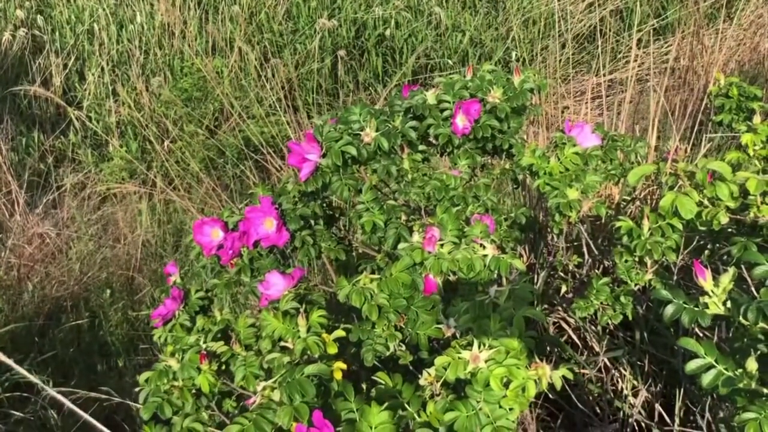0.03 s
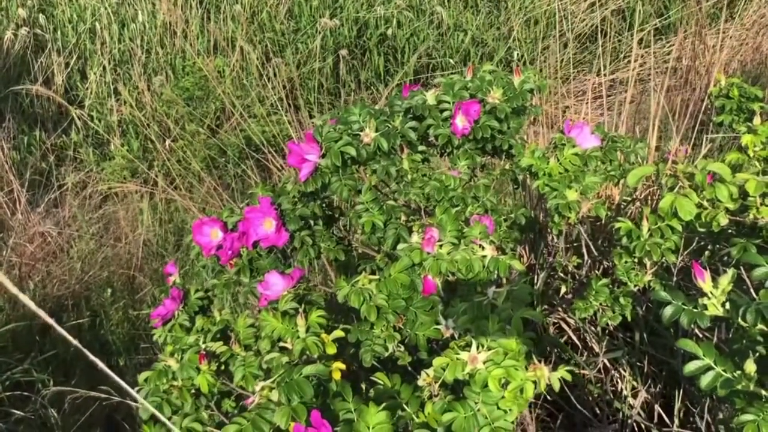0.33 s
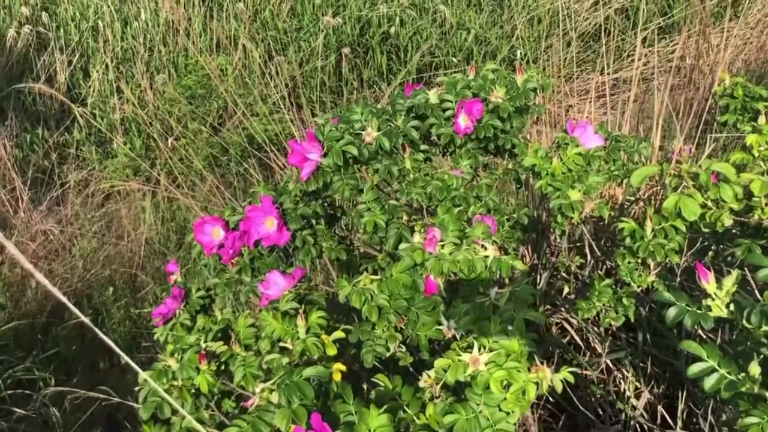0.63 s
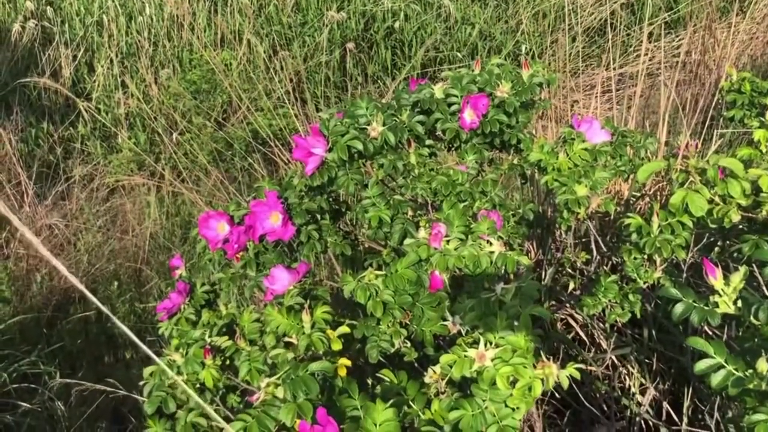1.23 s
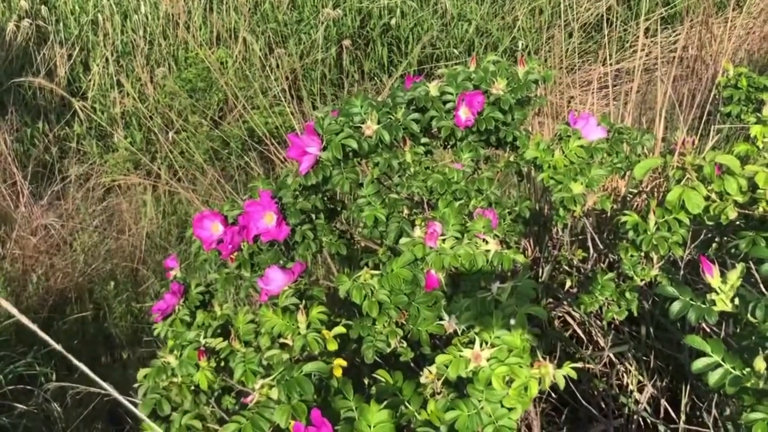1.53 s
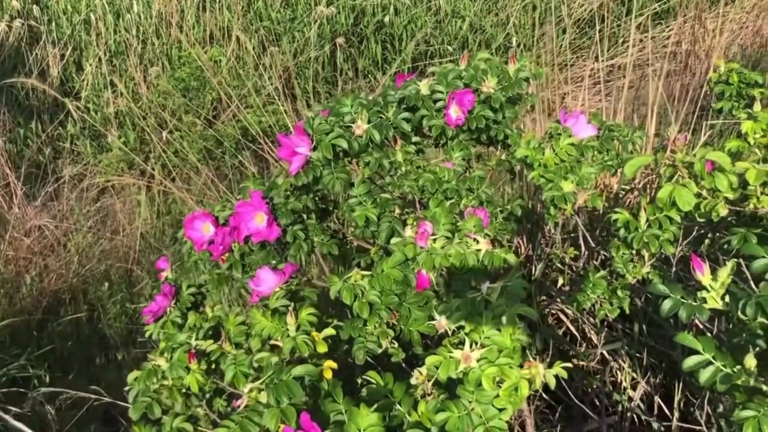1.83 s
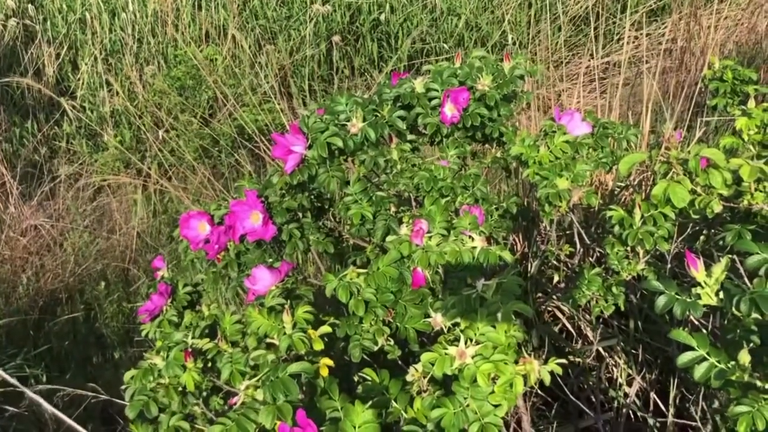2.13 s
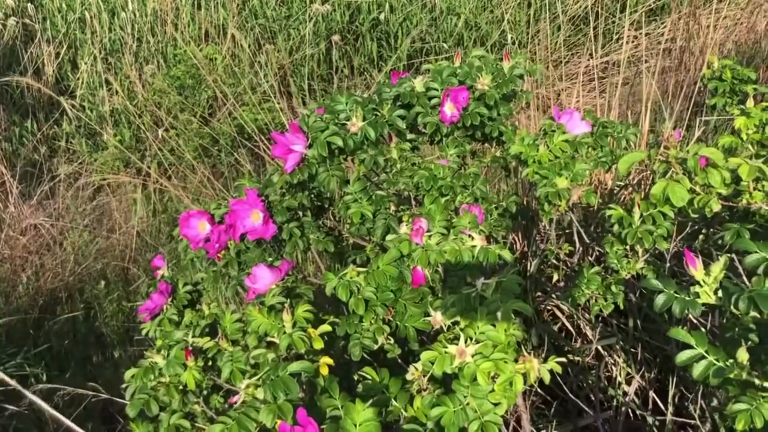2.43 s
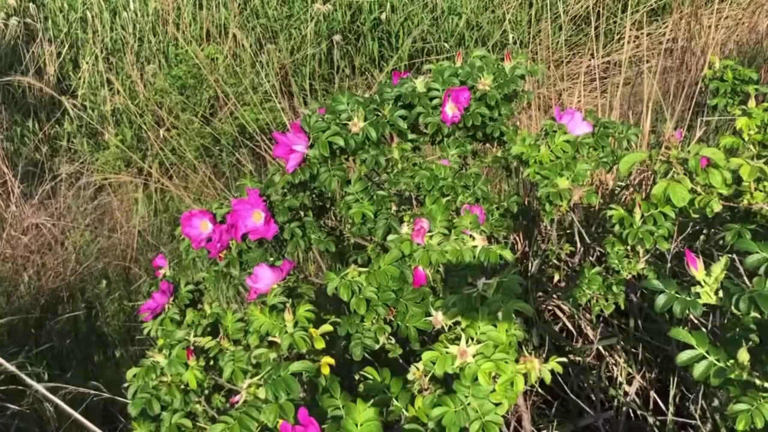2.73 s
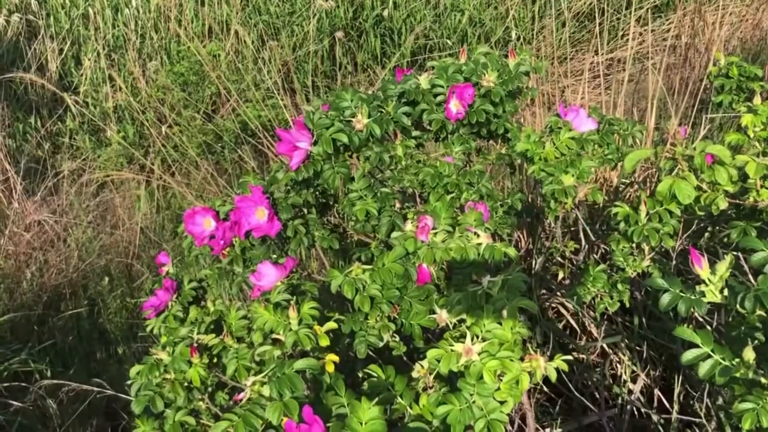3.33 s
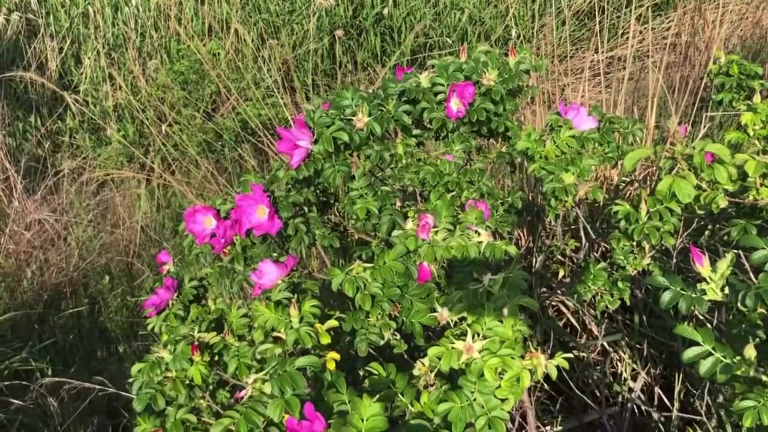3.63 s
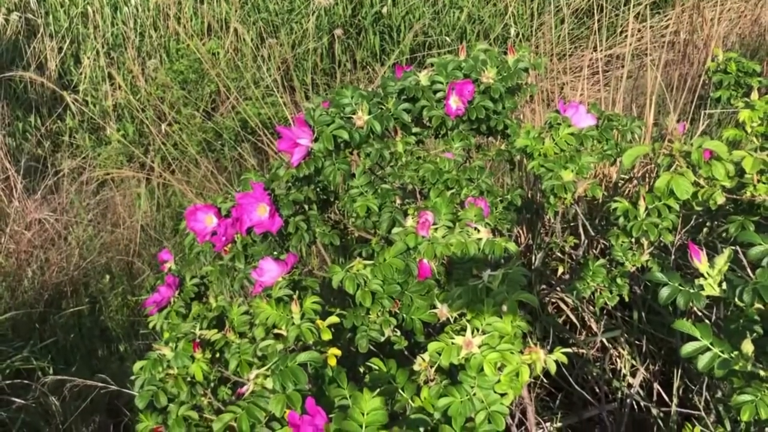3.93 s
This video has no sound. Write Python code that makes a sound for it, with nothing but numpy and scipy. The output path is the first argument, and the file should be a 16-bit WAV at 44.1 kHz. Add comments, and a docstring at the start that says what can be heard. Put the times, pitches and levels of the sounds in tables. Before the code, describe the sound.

A bullfrog gives four deep, rasping bellows in a steady rhythm at a quiet reedy pond. Between calls, faint birds chirp far off and something gulps once, while light wind softly bumps the microphone over a low rumble.

```python
"""A bullfrog bellows four times from a reedy pond on a quiet day.
Each call is a train of pulses in uneven groups of three that ring the throat, over the deep hum of
the vocal sac. Small birds chirp far off, something gulps once and dry stems tick, all scattered by
the reeds. Light wind bumps the microphone over a low outdoor rumble."""
import sys
import numpy as np
from scipy import signal
from scipy.fft import rfft, irfft
from scipy.io import wavfile
from scipy.ndimage import uniform_filter1d

SR = 44100
rng = np.random.default_rng(int(sys.argv[2]) if len(sys.argv) > 2 else 0)


def master_out(mix):
    """Clip the mix to full scale and print it as 16-bit PCM to the path in sys.argv[1]."""
    frames = np.transpose(np.atleast_2d(mix))
    ceiling = np.clip(frames, -1, 1)
    pcm = np.round(ceiling * 32767).astype(np.int16)
    wavfile.write(sys.argv[1], SR, pcm)


N = 176400

# Each row: start in seconds, length in seconds, base pulse rate in Hz, rasp gain in dB, hum gain in dB.
CALLS = [(0.028, 0.74, 86, -0.5, -2), (1.2005, 0.76, 86.7, 1, -1.5), (2.462, .775, 87.5, 0.5, -1.5),
         (3.747, 0.88, 86.2, 1.5, -0.5)]
# Each row: fraction of the call's length, throat gain in dB, effort in dB, sac gain in dB.
CALL_ENVELOPE = [(0, -26, -10.5, -31.5), (0.069, -13, -13, -20), (0.138, -4.5, -11.5, -17.5),
                 (0.198, -1, -6, -12.5), (0.279, 0.5, -1.5, -6), (.43, 0, 0, 0.7), (.6, 0.5, -1, 0.5),
                 (0.748, 1, -5, 0.5), (.89, 0.5, -11.5, -2), (.95, -13, -9, -6), (1, -35, -26, -17.5)]
# Each row: delay in ms, accent weight for one pulse of a group of three.
PULSE_TRIPLET = [(-.21, 1), (.06, -.5), (.16, -1)]
# Each row: frequency in Hz, throat gain at full effort in dB.
THROAT_RESPONSE = [(60, -32), (200, -15), (300, -8), (440, -3.5), (480, -4), (525, -5), (580, -10.5),
                   (660, -13), (740, -6.5), (815, -1.5), (870, -7), (950, -9.5), (1040, 1.5), (1145, 7),
                   (1260, -7.5), (1440, -1), (1600, -9.5), (1760, -7), (1950, -18.5), (2080, -18.5),
                   (2300, -23.5), (2650, -26), (2890, -22.5), (3400, -36), (5500, -45.5), (9000, -69),
                   (16000, -75)]
# Each row: frequency in Hz, change of throat gain in dB per dB of effort.
EFFORT_SLOPE = [(300, 1.4), (440, 1.07), (520, -0.09), (640, 1.5), (810, -.15), (950, .5), (1120, 1.31),
                (1450, 1.5), (2000, 2), (3000, 1.9), (6000, 0.8)]
# Each row: mid-call frequency in Hz, width in Hz, relative level in dB.
WHEEZE_BANDS = [(4530, 240, -63), (5520, 330, -65), (6960, 420, -72)]
# Each row: start and length in seconds, first, middle and last pitch in Hz, relative level in dB,
# width in Hz.
BIRD_CHIRPS = [(0.199, .06, 4300, 3660, 3500, -55, 700), (.815, .035, 4690, 4600, 4550, -68, 60),
               (0.909, 0.079, 4100, 3550, 3570, -61.5, 500), (0.934, .045, 2970, 2700, 2530, -69, 150),
               (0.987, .052, 3320, 4400, 2920, -66, 80), (0.981, 0.048, 2910, 2250, 1980, -60, 60),
               (1.976, 0.071, 3150, 3050, 3400, -64.5, 40), (2.067, 0.075, 3250, 3500, 3350, -64.5, 120),
               (2.534, 0.022, 4300, 4350, 4470, -63, 58.3), (2.589, 0.062, 2760, 2330, 2200, -52.5, 260),
               (2.593, .035, 4130, 3950, 3960, -57.5, 220), (2.94, 0.049, 5400, 4300, 3200, -55.5, 900),
               (3.087, 0.053, 5300, 4930, 4350, -58.5, 800), (3.245, 0.05, 4600, 4100, 3420, -63, 800),
               (3.5, 0.038, 3400, 3110, 3010, -71, 300)]
# Each row: start in seconds, level in dB, centre in Hz, spread in octaves.
STEM_TICKS = [(2.449, -55, 11500, .3), (2.465, -53.5, 7960, 0.44), (2.634, -56, 8500, .5),
              (2.782, -48, 8200, 0.65), (3.161, -37.5, 1300, 0.54), (3.640, -46.5, 3920, 0.39)]
# Each row: centre time in seconds, half length in seconds, level in dB, frequency in Hz.
WIND_BUMPS = [(0.616, .025, -33.5, 86.3), (1.761, 0.022, -37.5, 61.5), (2.015, 0.017, -33, 79.8),
              (2.523, 0.011, -24, 79.3), (2.549, 0.0083, -23.5, 73.1), (2.654, 0.024, -30, 75.3),
              (3.345, 0.012, -39, 75.6), (3.585, 0.018, -38.5, 80.6)]
# Each row: frequency in Hz, relative spectral density in dB.
AIR_SPECTRUM = [(12, -62), (20, -15), (39, -10.5), (64, -2.5), (119, -10), (180, -14.5), (219, -14),
                (259, -22), (298, -19), (465, -26.5), (597, -27), (2030, -40), (3540, -41), (5230, -45.5),
                (15500, -50)]


def bullfrog_call(length_s, rate_hz, rasp_db, hum_db, rise_per_db=0.0011, sag_depth=0.07, sag_s=0.035):
    """Throat rasp and sac hum. Pitch rises with effort and sags as the air runs out."""
    t = np.arange(0, length_s, 1 / SR)
    fraction, *curves = np.transpose(CALL_ENVELOPE)
    throat_db, effort_db, sac_db = (np.interp(t / length_s, fraction, curve) for curve in curves)
    sag = sag_depth * np.exp((t - length_s) / sag_s)
    cycles = np.cumsum(rate_hz * (1 + rise_per_db * effort_db - sag)) / SR
    rasp = throat_pulses(t, cycles, throat_db, effort_db) + wheeze(t, length_s, throat_db, effort_db)
    return amp(rasp_db) * rasp, amp(hum_db) * sac_hum(cycles, sac_db, effort_db)


def throat_pulses(t, cycles, throat_db, effort_db, gain_db=10.5, jitter_ms=0.053, shimmer_db=0.56):
    """One snap per cycle rings the throat. Triplet accents are strongest at low effort."""
    out = np.zeros(len(t))
    onsets = np.flatnonzero(np.diff(np.floor(cycles)))
    for k, i in enumerate(onsets):
        delay_ms, accent = PULSE_TRIPLET[k % len(PULSE_TRIPLET)]
        snap = fold_snap()
        delay_ms += jitter_ms * rng.standard_normal()
        start_s = t[i] + delay_ms / 1000 - len(snap) / 2 / SR
        accent_db = accent * (0.5 - 0.13 * effort_db[i])
        pulse_db = gain_db + throat_db[i] + accent_db + shimmer_db * rng.standard_normal()
        add(out, start_s, -amp(pulse_db) * signal.fftconvolve(snap, throat_ring(effort_db[i])))
    return out


def fold_snap(puff_db=-20.5, puff_ms=1.57, low_cut_hz=1500, size=512):
    """One snap of the vocal folds inside a puff of turbulent air."""
    t_ms = (np.arange(size) - size // 2) * 1000 / SR
    hiss = signal.lfilter(*signal.butter(2, low_cut_hz, "high", fs=SR), rng.standard_normal(size))
    return (t_ms == 0) + amp(puff_db) * hiss * np.exp(-abs(t_ms) / puff_ms)


def throat_ring(effort_db, rise_per_db=0.0035, size=2048):
    """Minimum-phase impulse response of the throat: brighter and slightly higher with effort."""
    hz = np.fft.rfftfreq(size, 1 / SR) / (1 + rise_per_db * effort_db)
    gain_db = lookup(THROAT_RESPONSE, hz) + effort_db * lookup(EFFORT_SLOPE, hz)
    cepstrum = irfft(np.log(amp(gain_db)))
    cepstrum[1:size // 2] *= 2
    cepstrum[size // 2 + 1:] = 0
    return irfft(np.exp(rfft(cepstrum)))


def sac_hum(cycles, sac_db, effort_db, gain_db=-21):
    """The vocal sac swings twice per pulse. Its octave grows with level and effort."""
    phase = 2 * np.pi * 2 * cycles
    octave_db = -15 + 1.36 * sac_db + 0.36 * effort_db
    return amp(gain_db) * (amp(sac_db) * np.sin(phase) + amp(octave_db) * np.sin(2 * phase))


def wheeze(t, length_s, throat_db, effort_db, peak_s=0.43, spread_s=0.13, fall_per_s=0.35):
    """Thin overtones that swell and slide down through the call."""
    envelope = np.exp(-0.5 * ((t - peak_s) / spread_s) ** 2) * amp(throat_db + 0.68 * effort_db)
    glide = 1 - fall_per_s * (t - length_s / 2)
    return envelope * sum(amp(db) * noise_band(hz * glide, width) for hz, width, db in WHEEZE_BANDS)


def gulp(start_s=3.094, start_hz=362, rise_hz_per_s=1150, swell_s=0.014, peak_db=-22.5):
    """A short, hollow, rising gulp from the pond."""
    out, t = np.zeros(N), np.arange(SR // 5) / SR
    envelope = (t / swell_s) ** 2 * np.exp(2 * (1 - t / swell_s))
    phase = 2 * np.pi * np.cumsum(start_hz + rise_hz_per_s * t) / SR
    add(out, start_s, amp(peak_db) * envelope * np.sin(phase))
    return out


def stems(decay_s=0.0037, size=2048):
    """Dry stems tick: brief bursts of coloured noise."""
    out, t, hz = np.zeros(N), np.arange(size) / SR, np.fft.rfftfreq(size, 1 / SR)
    for start_s, db, centre_hz, spread_oct in STEM_TICKS:
        band = np.exp(-0.5 * (np.log2((hz + 1) / centre_hz) / spread_oct) ** 2)
        burst = unit_rms(irfft(rfft(rng.standard_normal(size)) * band))
        envelope = np.minimum(t * centre_hz / 2, 1) * np.exp(-t / decay_s)
        add(out, start_s, amp(db) * envelope * burst)
    return out


def birds():
    """Distant chirps, each a pure or raspy glide through three pitches."""
    out = np.zeros(N)
    for start_s, length_s, *pitches_hz, db, width_hz in BIRD_CHIRPS:
        progress = np.linspace(0, 1, round(length_s * SR))
        hz = np.polyval(np.polyfit([0, 0.5, 1], pitches_hz, 2), progress)
        envelope = np.sqrt(abs(np.sin(np.pi * progress)))
        add(out, start_s, amp(db) * envelope * noise_band(hz, width_hz))
    return out


def reeds(x, t60_s, density=0.05, gap_s=0.002):
    """Scatter from the reeds and the bank: a short, sparse tail."""
    t = np.arange(SR // 2) / SR
    echoes = rng.standard_normal(len(t)) * (rng.random(len(t)) < density) * (t > gap_s)
    tail = echoes * amp(-60 * t / t60_s)
    return signal.fftconvolve(x, tail / np.linalg.norm(tail))[:N]


def wind(low_cut_hz=45):
    """Puffs of wind give the microphone soft, low bumps."""
    out, t = np.zeros(N), np.arange(-SR // 10, SR // 10) / SR
    for centre_s, half_s, db, hz in WIND_BUMPS:
        puff = noise_band(np.full(len(t), hz), width_hz=60) * np.exp(-0.5 * (t / half_s) ** 2)
        rms = np.sqrt(np.sum(puff ** 2) / (2 * half_s * SR))
        add(out, centre_s + t[0], amp(db) * puff / rms)
    return signal.sosfilt(signal.butter(4, low_cut_hz, "high", fs=SR, output="sos"), out)


def air(level_db=-43.5, patch_db=1.55, swell_db=0.06, size=2048):
    """Low outdoor rumble and faint hiss, drifting in patches."""
    hop = size // 4
    hz, frames = np.fft.rfftfreq(size, 1 / SR), N // hop + 5
    real, imag, patches = rng.standard_normal((3, frames, len(hz)))
    patches = uniform_filter1d(patches, size=6, axis=0)
    patches = unit_rms(uniform_filter1d(patches, size=30, axis=1))
    swell = unit_rms(uniform_filter1d(rng.standard_normal(frames), size=14))[:, None]
    spectra = (real + 1j * imag) * amp(lookup(AIR_SPECTRUM, hz) + patch_db * patches - swell_db * swell)
    _, noise = signal.istft(spectra.T, nperseg=size, noverlap=size - hop)
    return amp(level_db) * unit_rms(noise[:N])


def noise_band(hz, width_hz):
    """Narrow noise that follows a pitch curve."""
    offset_hz = np.fft.fftfreq(len(hz), 1 / SR)
    phasors = np.exp(2j * np.pi * rng.random(len(hz)))
    baseband = np.fft.ifft(phasors / (1 + (2 * offset_hz / width_hz) ** 2))
    carrier = np.exp(2j * np.pi * np.cumsum(hz) / SR)
    return unit_rms((baseband * carrier).real)


def amp(db):
    """Decibels to gain."""
    return 10 ** (np.asarray(db) / 20)


def unit_rms(x):
    """Scales to rms 1."""
    return x / np.sqrt(np.mean(x ** 2) + 1e-20)


def lookup(table, hz):
    """Interpolates on a log-frequency axis."""
    table_hz, values = np.transpose(table)
    return np.interp(np.log(hz + 1), np.log(table_hz + 1), values)


def add(mix, start_s, sound):
    """Mixes a sound in at a time."""
    part = mix[max(round(start_s * SR), 0):][:len(sound)]
    part += sound[:len(part)]


def scene():
    """The frog in front, everything else faint around it. Mono."""
    rasps, hums = np.zeros((2, N))
    for start_s, *call in CALLS:
        rasp, hum = bullfrog_call(*call)
        add(rasps, start_s, rasp)
        add(hums, start_s, hum)
    direct = rasps + gulp() + stems()
    chirps = birds()
    near = hums + direct + amp(-4.5) * reeds(direct, t60_s=0.11)
    far = amp(-1.5) * chirps + amp(-2) * reeds(chirps, t60_s=0.33)
    return (near + far + wind() + air())[None]


def record(dry):
    """Low-pass at 15.8 kHz."""
    low_pass = signal.firwin(511, 15800, window=("kaiser", 9), fs=SR)
    return signal.oaconvolve(dry, low_pass[None], "same")


dry = scene()
out = record(dry)
master_out(out)
```